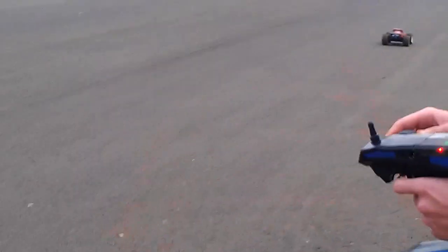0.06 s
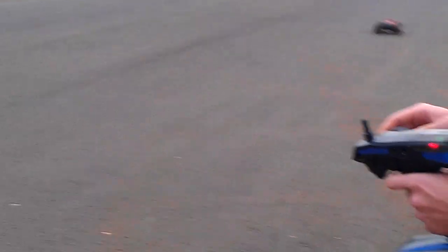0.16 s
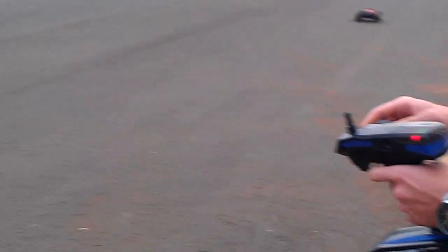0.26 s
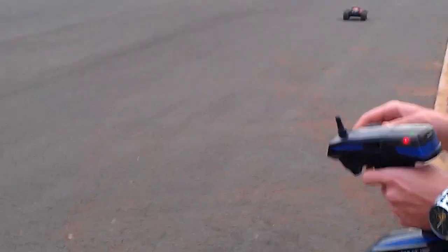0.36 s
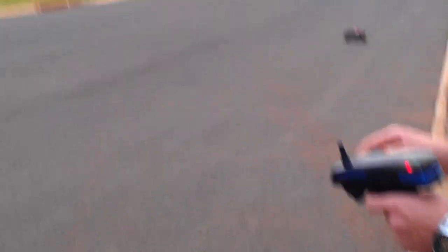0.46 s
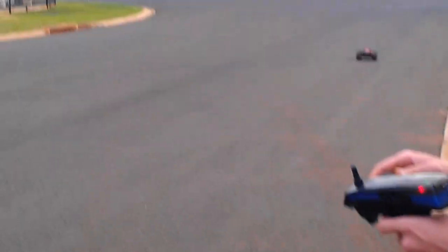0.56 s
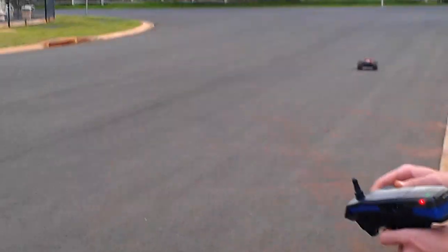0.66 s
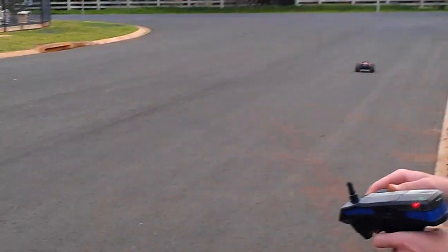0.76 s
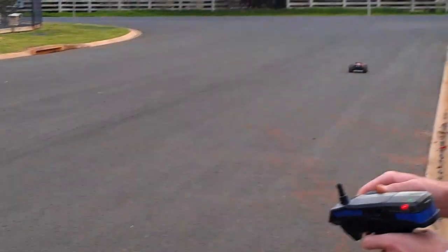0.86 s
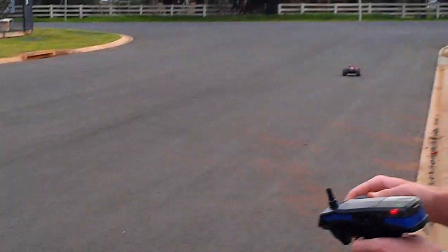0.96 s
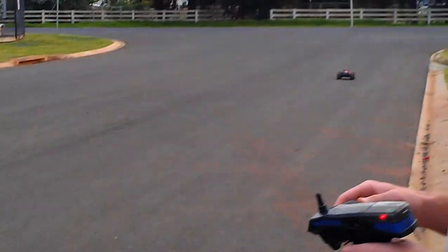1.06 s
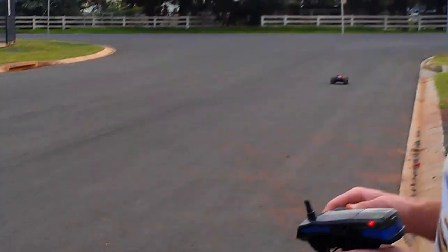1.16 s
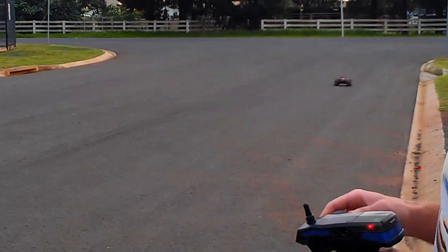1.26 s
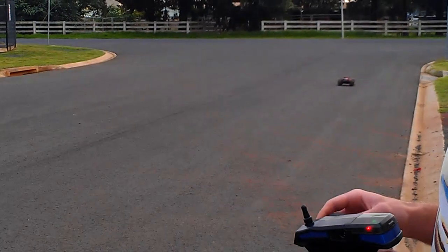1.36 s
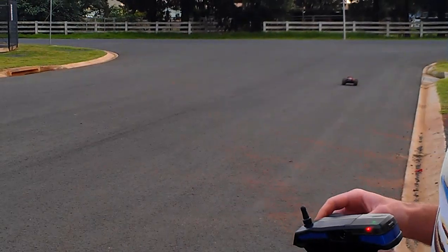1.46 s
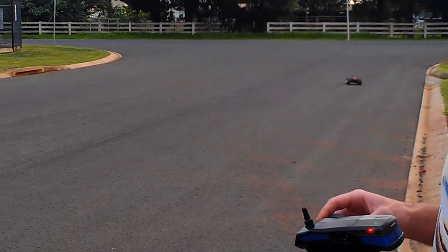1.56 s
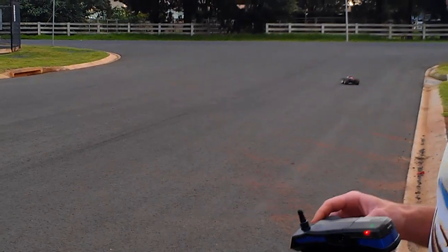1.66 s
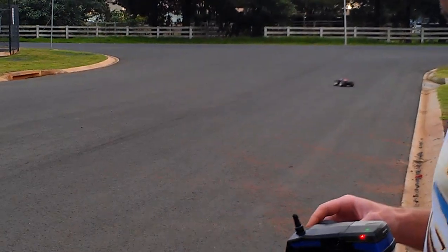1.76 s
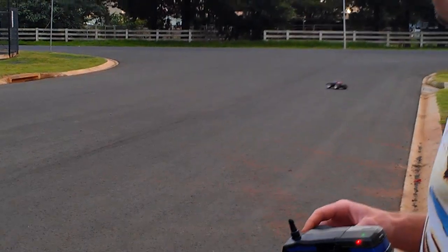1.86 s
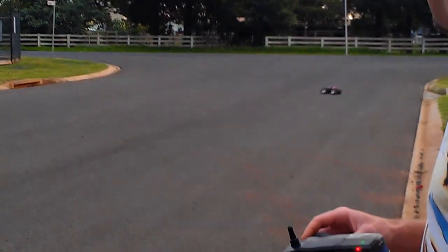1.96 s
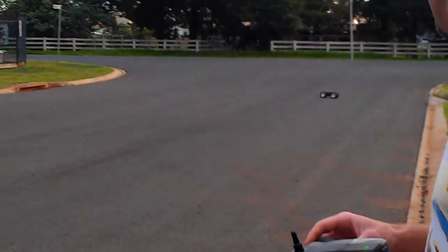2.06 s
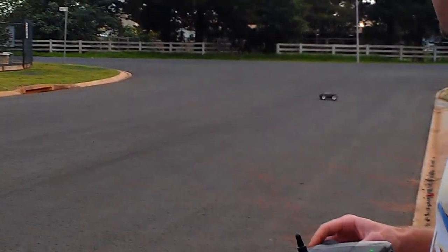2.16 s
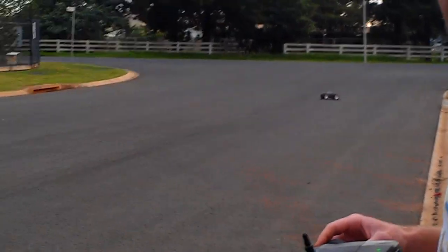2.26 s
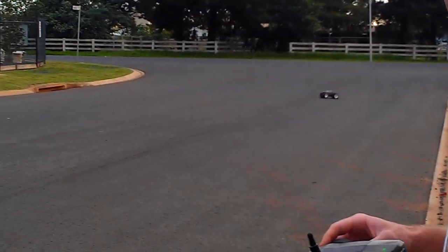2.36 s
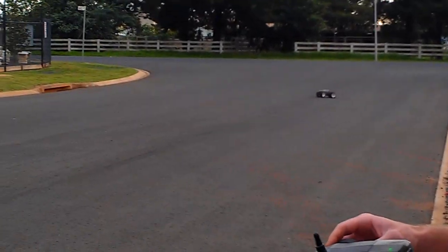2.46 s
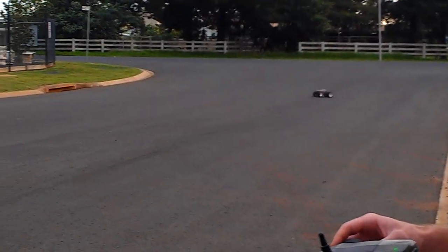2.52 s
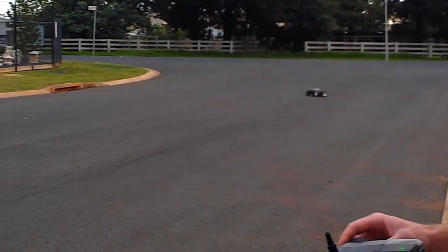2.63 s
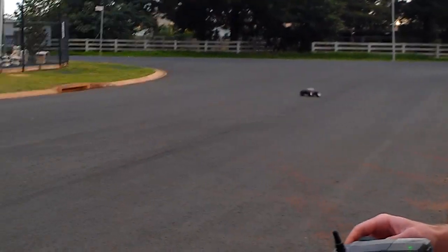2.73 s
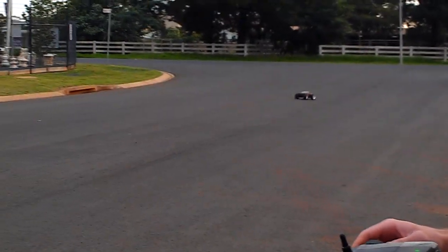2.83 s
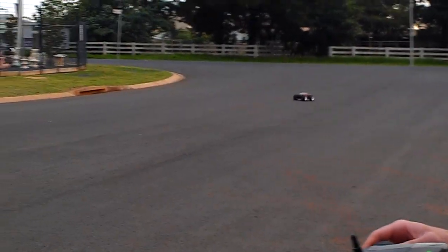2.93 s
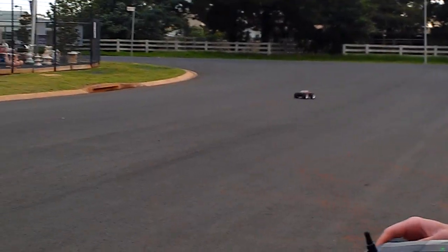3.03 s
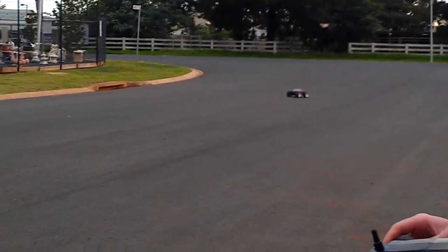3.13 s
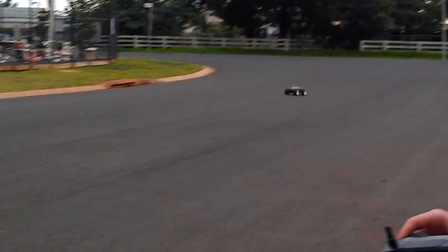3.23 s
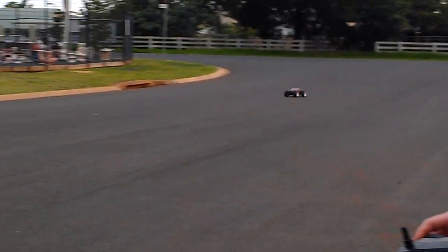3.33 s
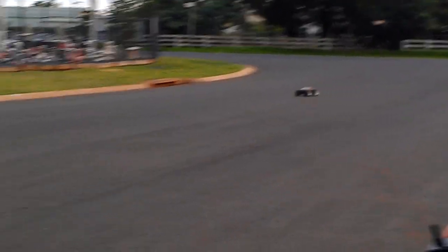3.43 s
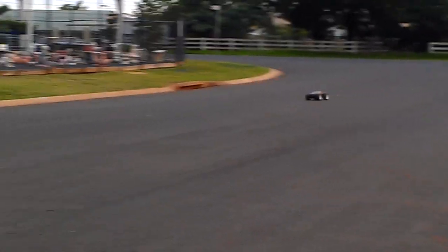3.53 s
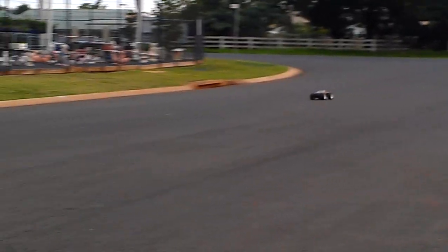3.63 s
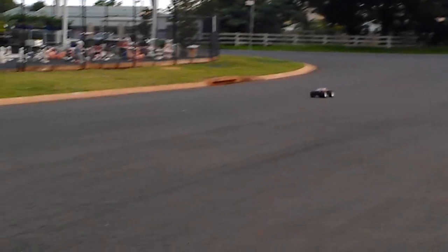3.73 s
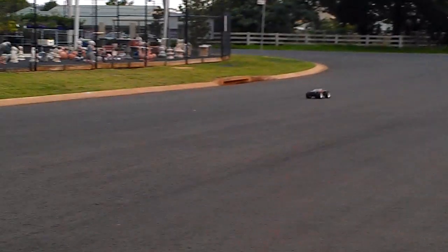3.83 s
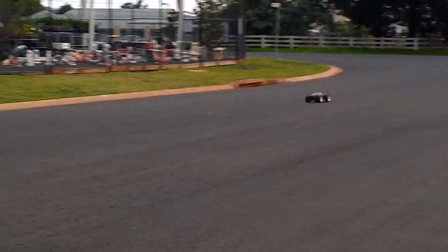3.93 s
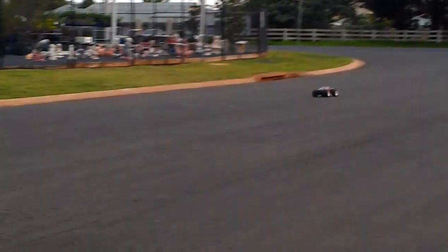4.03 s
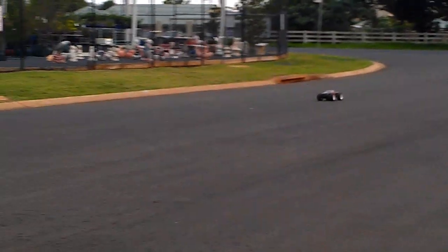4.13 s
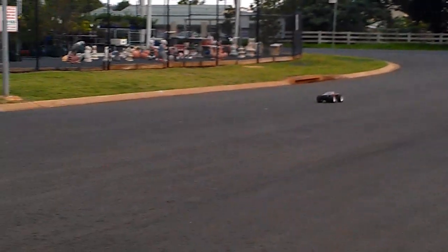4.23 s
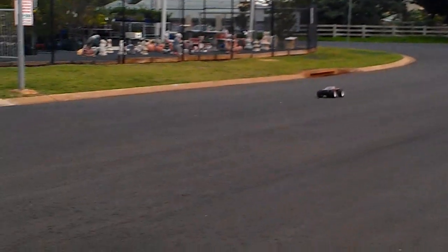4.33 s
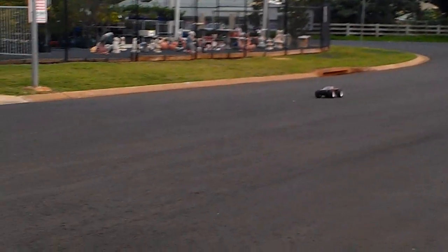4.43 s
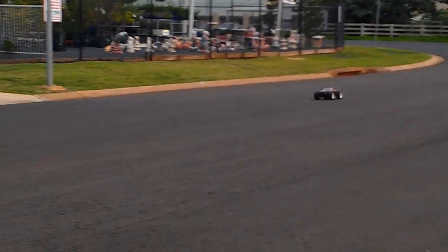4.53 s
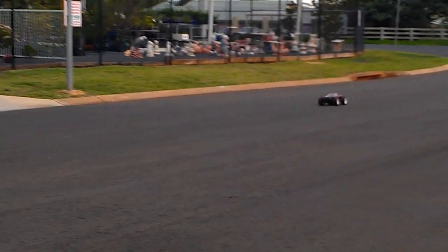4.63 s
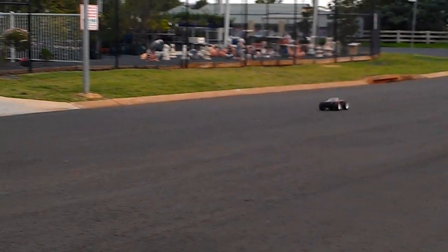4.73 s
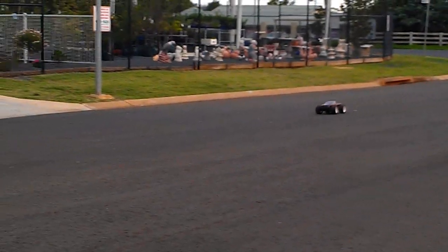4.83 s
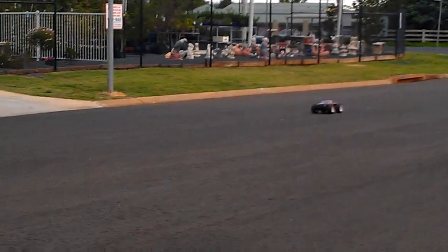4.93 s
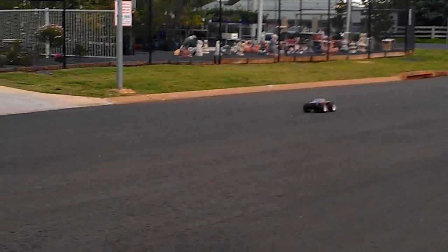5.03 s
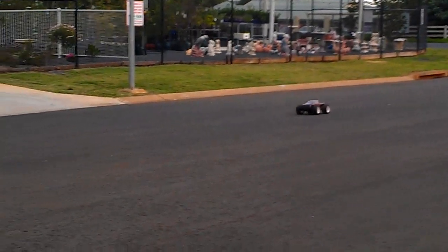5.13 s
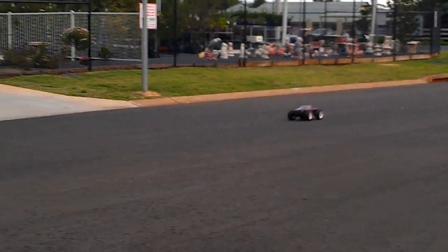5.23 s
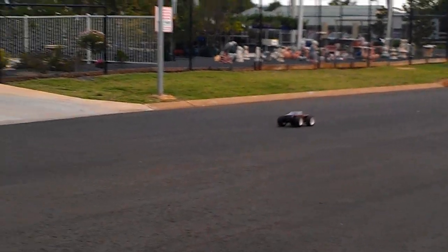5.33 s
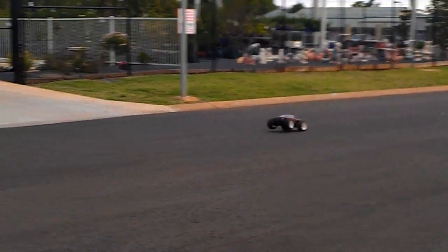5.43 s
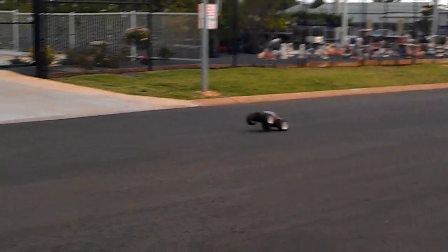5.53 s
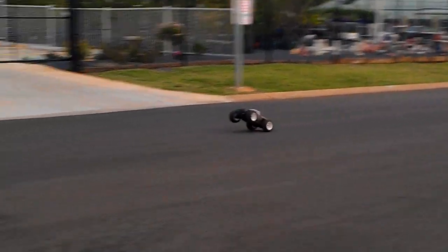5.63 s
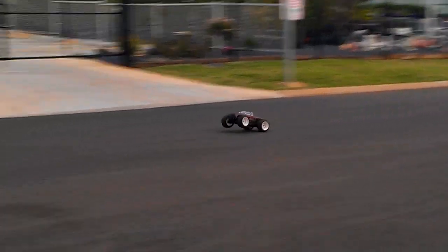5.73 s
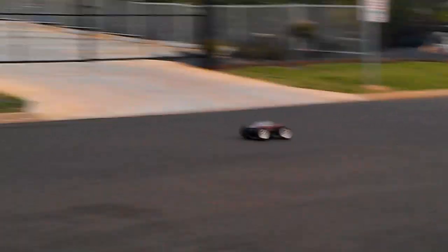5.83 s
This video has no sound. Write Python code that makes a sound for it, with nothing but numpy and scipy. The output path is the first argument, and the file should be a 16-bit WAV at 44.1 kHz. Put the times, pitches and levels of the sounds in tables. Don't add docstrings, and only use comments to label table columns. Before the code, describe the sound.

Open street outdoors, handheld stereo microphone, little bass, a steady soft hush. From 0 to 1 second, low wind puffs flutter while a small electric truck rolls away with grainy tyre and drive noise. A clear, thin bird whistle around 4.5 kHz sinks at 0.25-0.5 s; fainter ones come at 1.35 and 1.7 s. Tiny dry ticks fall at 1.25, 2.5 and 3.8 s. The truck is faint until about 2.5 s, when gears catch and the whine jumps from roughly 800 to 1,800 Hz, rough and buzzy. It rises to 2,100 Hz by 3.5 s over a faint swelling far drone, then eases, purer and strong near 4.1 s, quieter around 4.5-5. From 5.1 s it surges and stutters, racing to 3,500 Hz by 5.5 s, smearing. From 5.43 to 5.8 s, loud, dense plastic slaps and grit crackle dominate, with sharp overload clicks, then quickly thin out.

```python
import sys
import numpy as np
from scipy import signal
from scipy.fft import rfft, irfft
from scipy.io import wavfile
from scipy.ndimage import uniform_filter1d, minimum_filter1d

SR = 44100
rng = np.random.default_rng(int(sys.argv[2]) if len(sys.argv) > 2 else 0)


def bounce(signal):
    frames = np.transpose(np.atleast_2d(signal))
    limited = np.clip(frames, -1, 1)
    pcm = np.round(limited * 32767).astype(np.int16)
    wavfile.write(sys.argv[1], SR, pcm)


def field_ratio(decibels):
    return 10 ** (np.asarray(decibels, dtype=float) / 20)


N = 259308

# frequency in Hz, level in dB.
STREET_SPECTRUM = [(100, -30.5), (240, -16), (370, -22), (500, -5), (800, -17), (1200, -14.5), (1900, -10),
                   (2450, -7), (3000, -21), (6200, -33.5), (6700, -44), (9000, -62.5), (11000, -87)]
WIND_SPECTRUM = [(60, -59), (130, -16), (240, 4), (380, -6), (520, -10), (700, -25), (1200, -71)]
TYRE_SPECTRUM = [(400, -40.5), (600, -10), (780, 1.5), (950, -3.5), (1200, -9.5), (1600, -10.5),
                 (2000, -11.5), (2600, -57.5)]
DRIVE_SPECTRUM = [(900, -59.5), (1300, -10.5), (1700, -8.5), (1950, 0), (2200, 0.5), (2600, 0.5),
                  (3000, -6), (3500, -6), (4000, -32.5), (5000, -74)]
GRIT_SPECTRUM = [(2400, -64.5), (3200, -21), (3800, 3), (4300, 3.5), (4600, 0.5), (5300, -1.5),
                 (6300, -9.5), (7500, -56.5)]
SAND_SPECTRUM = [(5800, -43), (6500, 0.5), (7500, 1), (8500, -1), (9500, -6.5), (10500, -11),
                 (12000, -38.5), (14500, -38.5), (15500, -64)]

# start in seconds, peak in dB, frequency in Hz.
WIND_PUFFS = [(0.145, -19.5, 440), (0.263, -21.5, 357), (0.339, -17, 455), (0.367, -21, 286),
              (0.45, -22, 300), (0.506, -22.5, 367), (0.612, -22, 352), (0.65, -22.5, 348),
              (0.78, -16.5, 387), (0.811, -25, 366), (0.903, -22, 360), (0.987, -27, 318),
              (1.402, -27.5, 290)]
# centre in seconds, lift in dB, half length in seconds.
WIND_EDDIES = [(0, -4, 0.27), (.53, 8, 0.093), (.79, 6.5, 0.029), (.91, 8, 0.039), (1.35, 8, 0.036),
               (1.6, -6, 0.2), (2.5, -9, 0.33), (3.8, -4, 0.3), (4.06, 5.5, 0.34), (4.72, 6.5, 0.19),
               (5.3, -13, 0.091), (5.6, -16, 0.3)]
BREEZE_DB, BLOW_S, BLOW_DB, BLOW_FADE_DB_PER_S = -56, 0.38, -41, 15.5

# centre in seconds, lift in dB, half length in seconds.
HUM_SWELLS = [
    (2.7, -6.5, 0.62),
    (3.5, 13.5, 0.51),
    (4.15, 13, 0.76),
    (5.88, 11.5, 0.5),
]
HUM_HZ, HUM_HZ_PER_DB, HUM_DB = 252.6, 0.81, -52.5

# start and length in seconds, first pitch in Hz, level in dB, loudest moment 0-1.
WHISTLES = [
    (0.236, 0.26, 4550, -26.5, 0.02),
    (1.339, 0.26, 4770, -41, 0.59),
    (1.718, 0.18, 4540, -42, 0.33),
]
# lower line in dB, upper line in dB.
WHISTLE_SIDE_LINES = [(-46, -32), (-8, -21), (-23, -11)]
# closing flick in dB, sink in Hz, step down on the way in Hz.
WHISTLE_FLICK_DB = [-35, -43, -55]
WHISTLE_SAG_HZ = [199.4, 283, 126]
WHISTLE_STEP_HZ = [110, 9, 7.8]
SAG_BEND, STEP_AT, STEP_WIDTH, BEAT_HZ = 0.97, 0.7, 0.061, 404
SWELL_DB, FADE_DB = -28, -7
FLICK_S, FLICK_FALL_HZ = 0.02, 750
# start in seconds, pitch in Hz, level in dB.
GRACE_NOTES = [
    (0.213, 4640, -19),
    (1.705, 4750, -38.5),
]
GRACE_S, GRACE_FALL_HZ = 0.017, 200
# start in seconds, length in seconds, level in dB.
FAR_NOTES = [(1.34, 0.31, -49), (1.73, 0.24, -49)]
FAR_NOTE_HZ, FAR_FALL_HZ = 2920, 50

# time in seconds, peak in dB.
LATCH_TICKS = [(1.247, -35.5), (2.5258, -34), (3.8137, -31)]

# time in seconds, tyre level in dB, drive over tyres in dB, left minus right in dB.
TRUCK_PATH = [(0.0, -40.5, 5, -1.5), (0.55, -41, 3, 0), (1.19, -51, 1.5, 1), (1.7, -51, -2, 1),
              (1.92, -40.5, -6.5, -1), (2.02, -45.5, -11.5, 0.5), (2.45, -48, -7, 1.5),
              (2.77, -38.5, 1, -1.5), (3.13, -46, 5, 0), (3.45, -42.5, 12, -2.5), (3.65, -44.5, 4.5, -2),
              (4.11, -41, 7.5, -5), (4.41, -46, 5.5, -2.5), (4.95, -44.5, 10.5, -2), (5.13, -40.5, 16, -4),
              (5.34, -46, 18, -3), (5.6, -27.5, 11, -2), (5.88, -38.5, 10, -1)]
# centre in seconds, lift in dB, half length in seconds.
TRUCK_JOLTS = [(0.0, 2.5, 0.093), (2.6, 1.5, 0.067), (3.32, 1.5, 0.059), (5.04, -0.5, 0.03),
               (5.475, 2, 0.038), (5.53, 1, 0.023), (5.63, -1.5, 0.033), (5.68, 0.5, 0.035),
               (5.73, 2, 0.021), (5.764, -1, 0.0043), (5.786, 2.5, 0.0087), (5.81, -2.5, 0.028)]
# centre in seconds, lift in dB, half length in seconds.
TYRE_THUMPS = [
    (5.47, 7.5, 0.011),
    (5.59, -0.5, 0.046),
    (5.735, 0.5, 0.0074),
    (5.76, -6.5, 0.024),
]
# centre in seconds, lift in dB, half length in seconds.
SAND_KICKS = [(.57, 3.5, 0.059), (3.5, 4, 0.1), (3.81, 8, 0.033), (4.7, 5, 0.13), (5.15, 6, 0.12),
              (5.52, 7.5, 0.06)]
GRIT_DB, GRIT_PER_THROTTLE = 1, 0.95
SAND_DB, SAND_PER_GRIT = -40.5, 0.35
# frequency in Hz, half width in Hz, dB over drive, extra dB per dB of throttle.
HOUSING_MODES = [(1897, 72, -4.5, -0.35), (2670, 54, -9.5, 0), (3186, 35, -12.5, 0),
                 (4270, 90, -11.5, 0.94), (2374, 60, -19, 0.56), (4640, 69, -13.5, -0.65)]
# centre and half length in seconds, Hz, half width in Hz, dB.
FUZZY_RINGS = [(0.296, .5, 1924, 60, -45.5), (1., 0.4, 3176, 25, -54), (0.699, .7, 2600, 25, -55),
               (2.562, .02, 2010, 40, -38), (2.566, .016, 2250, 40, -40), (2.69, 0.11, 4440, 50, -41.5),
               (2.888, 0.026, 4030, 40, -36), (3.095, 0.072, 4410, 50, -39), (4.2, 0.6, 5370, 70, -46),
               (4.152, .35, 4900, 50, -55), (4.25, 0.38, 4180, 70, -44), (4.697, 0.55, 3450, 35, -48),
               (4.849, 0.4, 4270, 70, -42), (5.1, .14, 5840, 50, -40.5), (5.401, .09, 4270, 70, -24),
               (5.507, 0.034, 2965, 80, -18.5), (5.51, 0.035, 4020, 70, -23), (5.549, .04, 4220, 80, -19.5),
               (5.601, .09, 2060, 70, -18.5), (5.6, .08, 906, 90, -26), (0.501, .6, 766, 50, -47),
               (2.6, .05, 4870, 250, -53), (4.553, .3, 4060, 120, -45), (5.735, 0.022, 879, 60, -22)]
# time in seconds, peak in dB, brightness in dB.
CHASSIS_SLAPS = [(5.430, -9, -44), (5.464, -3, -40), (5.503, -2, -40), (5.517, 1, -33.5), (5.536, -4, -44),
                 (5.550, -2, -44), (5.570, -3, -42), (5.587, -8, -44), (5.608, -2, -44), (5.616, -4, -44),
                 (5.630, -5, -44), (5.646, -4, -44), (5.655, -3, -44), (5.666, -4, -36), (5.692, -7, -44),
                 (5.705, -7, -30), (5.7732, 4, -26), (5.784, -8, -40), (5.815, -16, -44), (5.852, -14, -44)]
# frequency in Hz, width in Hz, level in dB.
BODY_MODES = [(880, 200, -4), (1590, 140, 6), (2080, 160, 13), (2850, 160, 9), (4300, 160, 14),
              (5700, 200, 2)]

# multiple of the mesh rate, level in dB.
MOTOR_LINES = [(1.2, -45), (1.455, -47), (2.26, -44), (2.44, -47)]
# centre in seconds, lift in dB, half length in seconds.
MOTOR_PULLS = [
    (3.43, 23, 0.35),
    (5.2, 23.5, 0.2),
]
MOTOR_IDLE_DB, MOTOR_BLUR_HZ = -14.5, 30

SPUR, PINION = 45, 12
MESH_WOBBLE = [(1, SPUR, .25, .3), (2, SPUR, .5, .3), (1, PINION, .13, .4), (2, PINION, .08, .2)]
# time in seconds, teeth per second in Hz.
MESH_SPEED = [(2.47, 770), (2.545, 870), (2.578, 1320), (2.625, 1326), (2.67, 1560), (2.705, 1785),
              (2.9, 1740), (2.96, 1700), (3.16, 1782), (3.33, 1968), (3.5, 2115), (4.0, 2008), (4.41, 1892),
              (4.84, 1880), (5.04, 1955), (5.27, 2060), (5.35, 2190), (5.385, 2540), (5.41, 2660),
              (5.44, 3020), (5.485, 3520)]
# time in seconds, level in dB, octave over tone in dB.
MESH_WHINE = [(2.46, -44, -28), (2.56, -38, 2.5), (2.69, -41.5, -11), (2.76, -34, -19), (3.06, -40.5, -1.5),
              (3.29, -30, -10), (3.46, -31.5, 7), (3.54, -34.5, -0.5), (3.64, -36, -4.5), (3.95, -25, -12),
              (4.1, -18.5, -25.5), (4.3, -30.5, -14.5), (4.45, -33, -18), (4.96, -37, -0.5),
              (5.11, -19, -4.5), (5.26, -24, 6), (5.385, -15, -2), (5.52, -17, -38)]
# time in seconds, depth.
MESH_STRAIN = [(2.46, 1.3), (2.68, 1.2), (2.74, .95), (2.95, 1.05), (3.15, .4), (3.6, .25), (4.2, .25),
               (4.5, .4), (4.9, .4), (5.1, .45), (5.3, .5), (5.36, 1.75), (5.52, 2.2)]
# centre in seconds, lift in dB, half length in seconds.
MESH_SURGES = [(2.555, 0.5, .015), (2.72, 11.5, .015), (2.75, 3, 0.011), (2.865, 3.5, .02), (2.91, 1, .015),
               (3.465, 2.5, 0.018), (3.485, -2, .015), (5.045, 8, 0.024), (5.126, 4.5, .007),
               (5.139, -1, 0.0059), (5.15, 1, 0.0075), (5.159, 4, .006), (5.182, 3, 0.0064),
               (5.193, -8.5, .005), (5.204, 4, 0.0077), (5.213, 4, .005), (5.224, 7, 0.009),
               (5.271, 0.5, 0.0057), (5.28, -2, .005), (5.293, 7, 0.0053), (5.301, -2, .005),
               (5.315, -1.5, .006), (5.326, -1, .007), (5.337, 4.5, 0.0036), (5.367, -1, 0.0072),
               (5.385, 3.5, .012), (5.398, -9, .007), (5.411, -1, 0.0064), (5.423, -2, .006),
               (5.44, 3, 0.018), (5.46, 0.5, .008), (5.482, 4, 0.0085)]
# centre in seconds, lift in dB, half length in seconds.
OCTAVE_LIFTS = [(2.55, -8, .05), (2.98, 4, .08), (3.7, 3, .25), (4.2, 5, .4), (4.65, 5, .35)]
# centre in seconds, lift in dB, half length in seconds.
THIRD_LIFTS = [(2.6, -4, 0.097), (2.76, 14, .02), (2.8, 18, .015), (2.825, -6, .012), (2.855, 20.5, .03),
               (2.95, -8, .08)]
THIRD_DB, THIRD_DB_PER_STRAIN = -42, 21
# mark in Hz, slope above it in dB per kHz.
MUFFLE_HZ = [9000, 4400, 6050]
MUFFLE_DB_PER_KHZ = [0, -21, -20]

# frequency in Hz, likeness of the two ports 0-1.
PORT_LIKENESS = [(100, 0.63), (300, 0.37), (700, 0.88), (1500, 0.7), (3000, 0.64), (5000, 0.22),
                 (8000, 0.35), (12000, .2)]
# frequency in Hz, lead of the left port in radians.
LEFT_LEAD = [(200, -2.1), (700, -1.9), (1400, -1.5), (2100, -1.2), (3400, -.9), (4200, -.2), (5800, .4),
             (7200, -.3)]
# frequency in Hz, left port level in dB.
LEFT_TILT = [(100, -3.5), (300, -1.5), (700, 0), (1500, -1.5), (3000, -4), (5000, -7), (9000, -5),
             (13000, -27.5)]
# frequency in Hz, width in Hz, lift in dB.
PORT_CAVITIES = [(739, 200, 4.5), (1950, 176, 2), (2020, 82, 2.5), (2180, 108, -2.5), (2320, 43, -2),
                 (2480, 48, -8.5), (2700, 220, -1.5), (3250, 31, -2), (3700, 200, 0), (4105, 37, 3),
                 (4086, 32, 1), (4900, 150, -2), (4900, 150, 6), (5130, 180, 2)]
LOW_CUT_HZ = 461
MASK_HZ, MASK_DB, MASK_SHARE = 6400, -64.5, 0.7
# time in seconds, click in dB, low bump in dB.
RIGHT_OVERLOADS = [(5.1247, -28.5, -56), (5.1818, -23, -60), (5.1928, -35.5, -54), (5.205, -11.5, -46),
                   (5.2706, -41, -60), (5.4432, -29.5, -57), (5.4662, -20.5, -59), (5.5068, -11, -42),
                   (5.5185, -19, -36), (5.5385, -32.5, -48), (5.558, -30, -52), (5.63, -34.5, -50),
                   (5.667, -25, -61), (5.7775, -28, -62)]
BUMP_S = 0.0035


def evened(x):
    return x / np.sqrt(np.mean(abs(x) ** 2) + 1e-20)


def read(points, hz):
    f, value = np.transpose(points)
    return np.interp(np.log(hz + 1), np.log(f + 1), value)


def along(rows):
    s, *columns = np.transpose(rows)
    return [np.interp(np.arange(N) / SR, s, c) for c in columns]


def bumps(rows):
    t = np.arange(N) / SR
    return sum(db * np.cos(np.pi / 2 * np.clip((t - s) / half, -1, 1)) ** 2 for s, db, half in rows)


def add(mix, s, sound):
    part = mix[round(s * SR):][:len(sound)]
    part += sound[:len(part)]


def wander(hz, channels=1, size=N):
    z = rng.standard_normal((channels, size)) + 1j * rng.standard_normal((channels, size))
    return evened(signal.sosfilt(signal.butter(2, hz, fs=SR, output="sos"), z))


def noise(colour, patchy_db, flicker_db):
    frames, hz = N // 128 + 5, np.fft.rfftfreq(512, 1 / SR)
    a, b, c, d, patches = rng.standard_normal((frames, 257, 5)).T
    patches = evened(uniform_filter1d(uniform_filter1d(patches, 5, 0), 20, 1))
    flicker = evened(uniform_filter1d(rng.standard_normal(frames), 3))
    same = np.clip(read(PORT_LIKENESS, hz), 0, 1)[:, None]
    left = a + 1j * b
    right = same * left + np.sqrt(1 - same ** 2) * (c + 1j * d)
    level_db = read(colour, hz)[:, None] + patchy_db * patches + flicker_db * flicker
    z = np.array([left, right]) * field_ratio(level_db)
    return evened(signal.istft(z, nperseg=512, noverlap=384)[1][:, :N])


def street():
    return field_ratio(-39) * noise(STREET_SPECTRUM, patchy_db=2, flicker_db=0.5) * field_ratio([[-1.5], [1.5]])


def hum():
    lift_db = bumps(HUM_SWELLS)
    turn = 2 * np.pi * np.cumsum(HUM_HZ + HUM_HZ_PER_DB * lift_db) / SR
    return field_ratio(HUM_DB + lift_db) * (wander(14, channels=2) * np.exp(1j * turn)).real


def wind():
    puffs = np.zeros(N)
    for s, peak_db, hz in WIND_PUFFS:
        t = np.arange(0, 4 / hz, 1 / SR)
        add(puffs, s, field_ratio(peak_db) * np.hanning(len(t)) * np.cos(2 * np.pi * hz * t))
    blow_db = BLOW_DB - BLOW_FADE_DB_PER_S * np.maximum(np.arange(N) / SR - BLOW_S, 0)
    flutter_db = np.maximum(blow_db, BREEZE_DB) + bumps(WIND_EDDIES) + 12.5
    flutter = field_ratio(flutter_db) * noise(WIND_SPECTRUM, patchy_db=1, flicker_db=2)
    return flutter + puffs * field_ratio([[-2.5], [4.5]])


def chirp(from_hz, fall_hz, length_s, db):
    hz = np.linspace(from_hz, from_hz - fall_hz, round(length_s * SR))
    return field_ratio(db) * np.hanning(len(hz)) * np.sin(2 * np.pi * np.cumsum(hz) / SR)


def bird():
    out = np.zeros(N)
    settings = zip(WHISTLES, WHISTLE_SIDE_LINES, WHISTLE_FLICK_DB, WHISTLE_SAG_HZ, WHISTLE_STEP_HZ)
    for (s, length, hz, db, top), (low_db, high_db), flick_db, sag_hz, step_hz in settings:
        t = np.arange(0, length, 1 / SR)
        way = t / length
        slipped_hz = step_hz * (1 + np.tanh((way - STEP_AT) / STEP_WIDTH)) / 2
        turn = 2 * np.pi * np.cumsum(hz - sag_hz * way ** SAG_BEND - slipped_hz) / SR
        beat = 2 * np.pi * BEAT_HZ * t
        tone = np.sin(turn) + field_ratio(low_db) * np.sin(turn - beat) + field_ratio(high_db) * np.sin(turn + beat)
        level_db = db + np.interp(way, [0, top, 1], [SWELL_DB * top, 0, FADE_DB])
        add(out, s, np.sqrt(2) * field_ratio(level_db) * tone * signal.windows.tukey(len(t), 0.1))
        flick = chirp(hz - sag_hz - step_hz, FLICK_FALL_HZ, FLICK_S, flick_db)
        add(out, s + length - 0.005, flick)
    for s, length, db in FAR_NOTES:
        add(out, s, chirp(FAR_NOTE_HZ, FAR_FALL_HZ, length, db))
    for s, hz, db in GRACE_NOTES:
        add(out, s, chirp(hz + GRACE_FALL_HZ / 2, GRACE_FALL_HZ, GRACE_S, db))
    return out * abs(1 + 0.22 * wander(40, channels=2)) * field_ratio([[-1.5], [3.5]])


def latch():
    t, out = np.arange(40) / SR, np.zeros(N)
    impacts = [(-0.003, -13, 5940), (0.0005, 1, 9900), (0.0008, -6, 5000), (0.0055, 4, 8900)]  # s, dB, Hz
    for s, peak_db in LATCH_TICKS:
        for late_s, db, hz in impacts:
            envelope = t * 22000 * np.exp(-t / 0.0001)
            add(out, s + late_s, field_ratio(peak_db + db) * np.sin(2 * np.pi * hz * t) * envelope)
    return out * field_ratio([[-4], [3]])


def crackle(hits_per_s=260, spread_db=5):
    buck_s = [2.5, 2.6, 2.9, 3.1, 5.38, 5.46, 5.75, 5.82]
    buck = np.interp(np.arange(N) / SR, buck_s, [0.12, 0.79, 0.46, 0, 0, 0.98, 0.28, 0.26])
    strength = field_ratio(spread_db * np.minimum(rng.exponential(1, N), 2))
    hits = (rng.random(N) < hits_per_s / SR) * strength
    decay = np.exp(-np.arange(500) / SR / 0.012)
    return 1 + 0.2 * buck * np.convolve(hits, decay)[:N]


def housing(throttle_db):
    t, out = np.arange(N) / SR, 0
    for hz, width, db, share in HOUSING_MODES:
        level_db = db + share * np.clip(throttle_db, -5, 10)
        out = out + field_ratio(level_db) * (wander(width) * np.exp(2j * np.pi * hz * t)).real
    return out


def rings():
    out = np.zeros(N)
    for s, half, hz, width, db in FUZZY_RINGS:
        t = np.arange(0, 2 * half, 1 / SR)
        fuzz = wander(width, size=len(t) + 4000)[0, 4000:]
        ring = field_ratio(db + 4.5) * np.hanning(len(t)) * (fuzz * np.exp(2j * np.pi * hz * t)).real
        add(out, max(s - half, 0), ring[max(round((half - s) * SR), 0):])
    return out


def slaps():
    t, out = np.arange(1500) / SR, np.zeros(N)
    for s, peak_db, bright_db in CHASSIS_SLAPS:
        spot_db = rng.uniform(-5, 5, len(BODY_MODES))
        shell = 0
        for (hz, width, db), more_db in zip(BODY_MODES, spot_db):
            decay = np.exp(-np.pi * 1.6 * width * t)
            shell = shell + field_ratio(db + more_db) * width * decay * np.sin(2 * np.pi * hz * t)
        burst = rng.standard_normal(len(t)) * np.exp(-t / 0.0032) * np.minimum(t / 0.0006, 1)
        body = np.convolve(burst, shell)[:len(t)]
        crack = np.diff(burst, prepend=0)
        slap = body / abs(body).max() + field_ratio(bright_db) * crack / abs(crack).max()
        add(out, s, field_ratio(peak_db) * slap)
    return out


def motor():
    turns = np.cumsum(along(MESH_SPEED)[0]) / SR
    lines = sum(field_ratio(db) * wander(MOTOR_BLUR_HZ) * np.exp(2j * np.pi * times * turns)
                for times, db in MOTOR_LINES)
    started = np.arange(N) / SR > MESH_SPEED[0][0]
    return field_ratio(MOTOR_IDLE_DB + bumps(MOTOR_PULLS)) * lines.real * started


def gears():
    (hz,), (tone_db, sharp_db), (strain,) = along(MESH_SPEED), along(MESH_WHINE), along(MESH_STRAIN)
    octave_db = tone_db + sharp_db + bumps(OCTAVE_LIFTS)
    third_db = tone_db + THIRD_DB + THIRD_DB_PER_STRAIN * np.minimum(strain, 1.3) + bumps(THIRD_LIFTS)
    running = np.interp(np.arange(N) / SR, [2.44, 2.47, 5.49, 5.51], [0, 1, 1, 0])
    chatter = np.maximum(strain - 0.9, 0) * 2.2
    spin = 0.85 * np.maximum(chatter - 1, 0)
    bite = np.clip(2.2 * strain, 0.55, 1)
    slip = 0.005 * chatter ** 2 * wander(40)[0].real
    turns = np.cumsum(uniform_filter1d(hz, size=500) * (1 + slip)) / SR
    both_sides = np.array([[1], [-1]])
    partials = zip([tone_db, octave_db, third_db], (1.1, 1.6, 1.3), (55, 140, 140), (0.35, 0.6, 0.7))
    out = np.zeros((2, N))
    for k, (level_db, grind, grind_hz, echo) in enumerate(partials):
        above_khz = np.maximum((k + 1) * hz - MUFFLE_HZ[k], 0) / 1000
        level_db = level_db + MUFFLE_DB_PER_KHZ[k] * above_khz
        rock = 0
        for count, teeth, *depths in MESH_WOBBLE:
            drift = 5.4j * wander(3.15, channels=2).real
            lines = np.exp(2j * np.pi * count / teeth * turns * both_sides + drift)
            rock = rock + depths[min(k, 1)] * lines.sum(0)
        shape = 1 + rock * bite + grind * strain * wander(grind_hz) + echo * wander(10.7, channels=2)
        shape += chatter * wander(200, channels=2) + spin * wander(600, channels=2)
        shape /= np.sqrt(1 + chatter ** 2 + spin ** 2 + (grind * strain) ** 2)
        out += np.sqrt(2) * field_ratio(level_db) * (shape * np.exp(2j * np.pi * (k + 1) * turns)).real
    return out * running * field_ratio(bumps(MESH_SURGES))


def truck():
    near_db, throttle_db, pan_db = along(TRUCK_PATH)
    near_db = near_db + bumps(TRUCK_JOLTS)
    grit_db = near_db + GRIT_PER_THROTTLE * throttle_db + GRIT_DB
    sand_db = SAND_PER_GRIT * grit_db + SAND_DB + bumps(SAND_KICKS)
    rolling = field_ratio(near_db + bumps(TYRE_THUMPS) + 8.5) * noise(TYRE_SPECTRUM, patchy_db=1, flicker_db=0.7)
    rattle = noise(DRIVE_SPECTRUM, patchy_db=2, flicker_db=1.3)
    drive = field_ratio(near_db + throttle_db + 5) * (rattle + housing(throttle_db))
    grit = field_ratio(grit_db) * noise(GRIT_SPECTRUM, patchy_db=1, flicker_db=1)
    sand = field_ratio(sand_db) * noise(SAND_SPECTRUM, patchy_db=2, flicker_db=1.7)
    body = crackle() * (drive + grit) + sand + field_ratio(3) * rings() + slaps()
    whine = field_ratio(4) * gears() + motor()
    side = field_ratio(np.array([pan_db / 2, -pan_db / 2]))
    return rolling + side * (body + whine)


def scene():
    return street() + hum() + wind() + bird() + latch() + truck()


def ports(dry):
    hz = np.fft.rfftfreq(N, 1 / SR)
    cavities_db = sum(db / (1 + (2 * (hz - f) / width) ** 2) for f, width, db in PORT_CAVITIES)
    low_cut = 1 / (1 + (LOW_CUT_HZ / (hz + 1)) ** 1.7)
    left = field_ratio(read(LEFT_TILT, hz)) * np.exp(1j * np.clip(read(LEFT_LEAD, hz), -np.pi, np.pi))
    return irfft(rfft(dry) * field_ratio(cavities_db - 3.5) * low_cut * [left, np.ones_like(hz)], N)


def limited(x):
    held = minimum_filter1d(1.04 / np.maximum(abs(x), 1.04), size=300)
    return np.clip(x * uniform_filter1d(held, size=300), -1, 1)


def thinned(x):
    hz, _, z = signal.stft(x, SR, nperseg=1024)
    power = abs(z) ** 2
    band = uniform_filter1d(uniform_filter1d(power, size=12, axis=1), size=3, axis=2)
    whole = uniform_filter1d(power.sum(1, keepdims=True), size=5, axis=2)
    mask_db = MASK_SHARE * 10 * np.log10(whole + 1e-20) + MASK_DB
    margin_db = 10 * np.log10(band + 1e-20) - mask_db
    keep = np.where(hz[:, None] > MASK_HZ, np.clip(margin_db / 0.75, 0, 1), 1)
    return signal.istft(z * keep, SR, nperseg=1024)[1][:, :N]


def overloads():
    out, bump = np.zeros((2, N)), np.hanning(round(BUMP_S * SR))
    for s, click_db, bump_db in RIGHT_OVERLOADS:
        add(out[1], s, field_ratio(click_db) * np.array([0.25, -0.2, -0.5, 0.14, 0.21, -0.1]))
        add(out[1], s - BUMP_S / 2, field_ratio(bump_db) * bump)
    return out


def low_pass(x):
    return signal.sosfilt(signal.butter(12, 15500, fs=SR, output="sos"), x)


def record(dry):
    heard = thinned(limited(ports(dry)))
    mix = np.clip(heard + overloads(), -1, 1)
    return low_pass(mix)


dry = scene()
out = record(dry)
bounce(out)
```